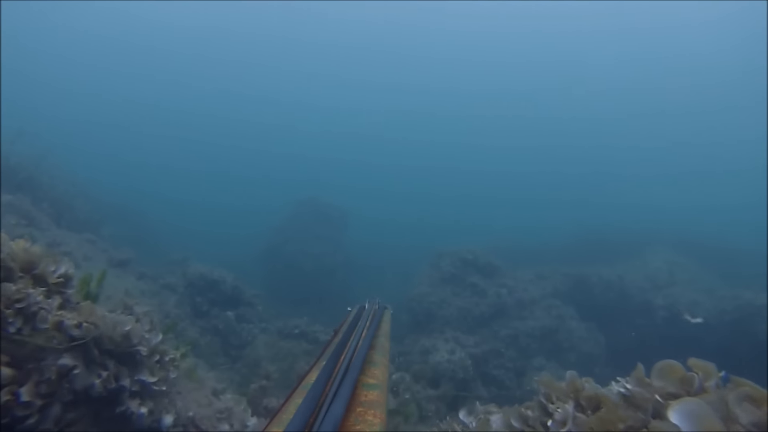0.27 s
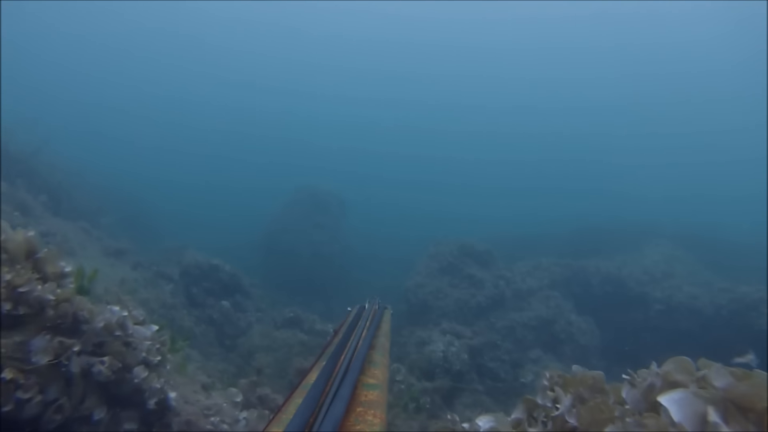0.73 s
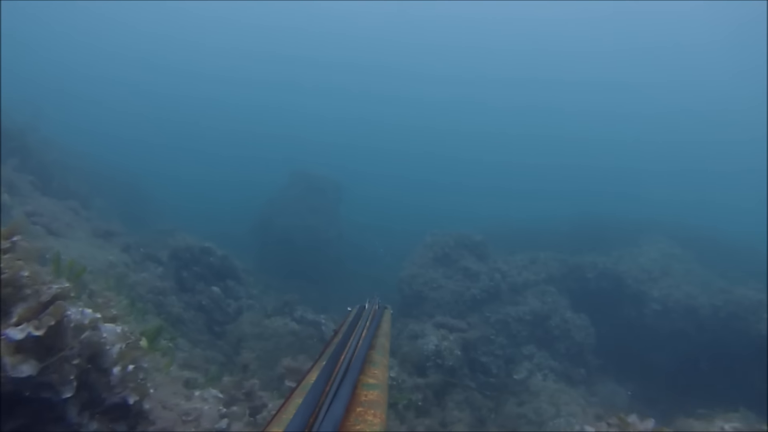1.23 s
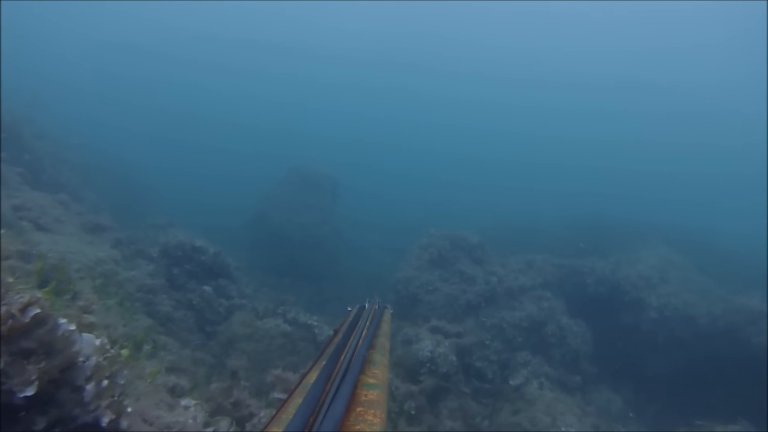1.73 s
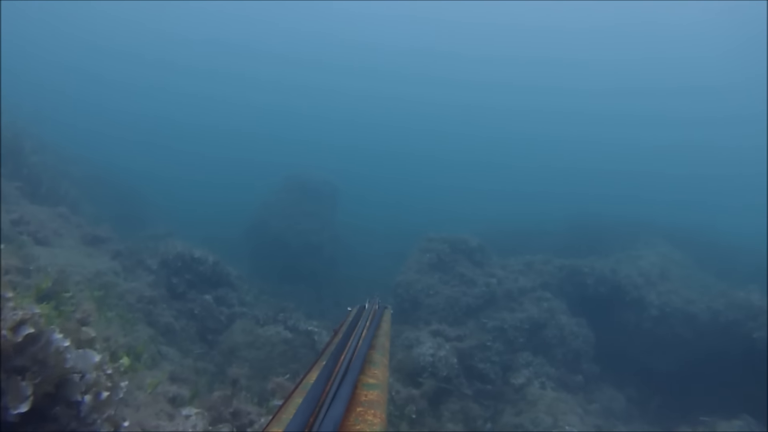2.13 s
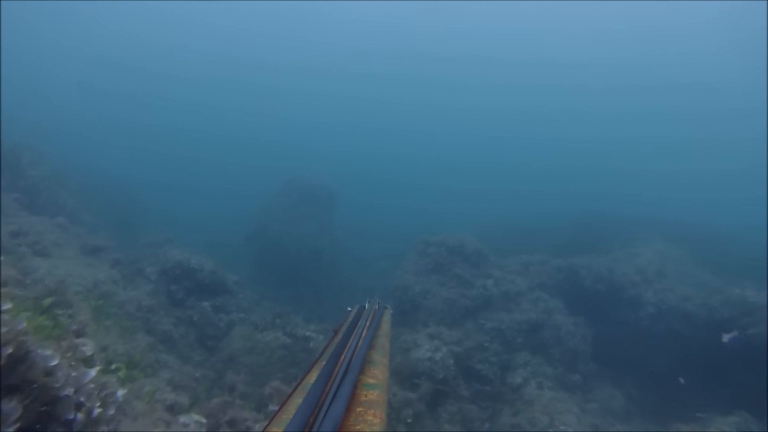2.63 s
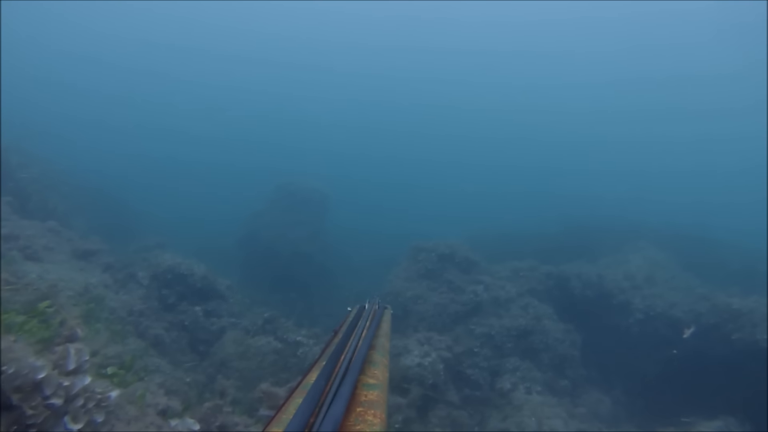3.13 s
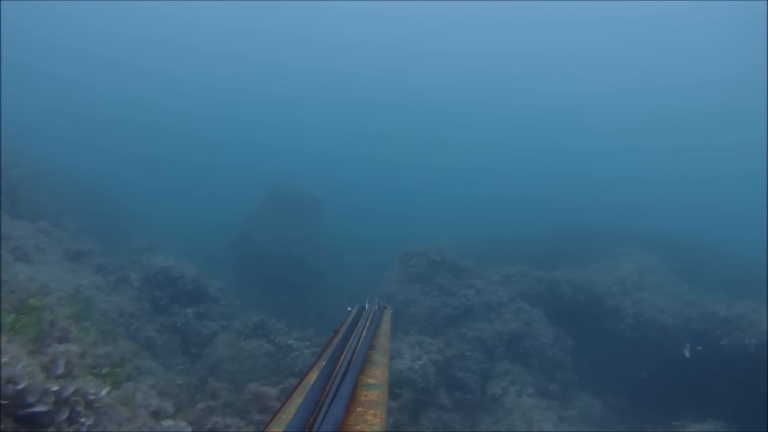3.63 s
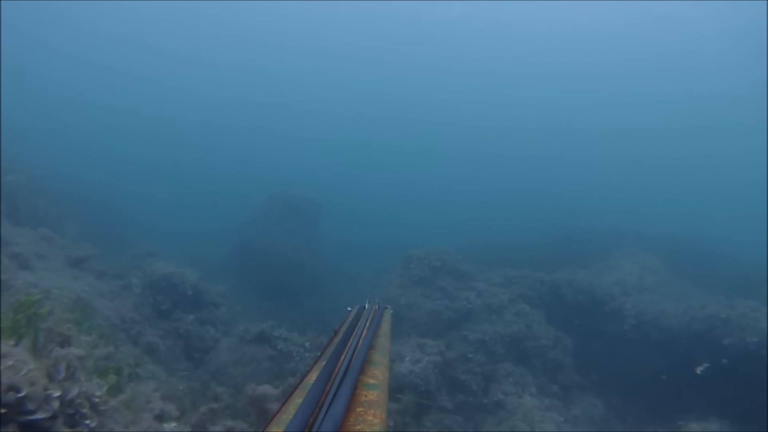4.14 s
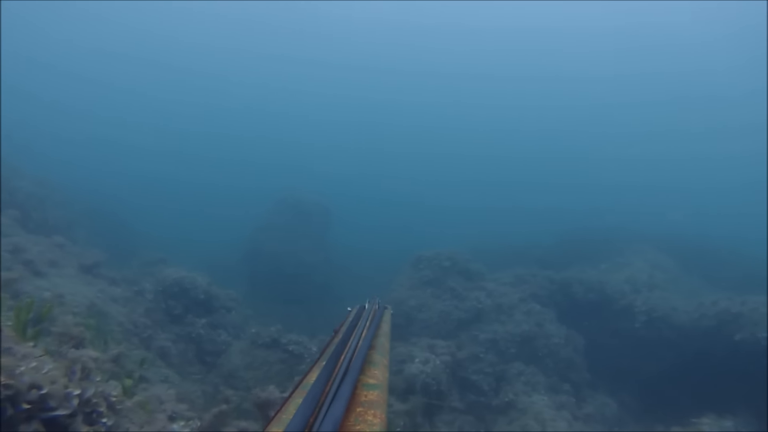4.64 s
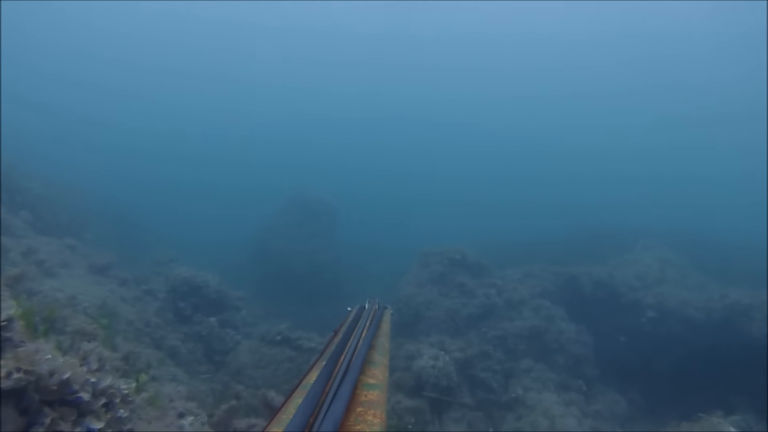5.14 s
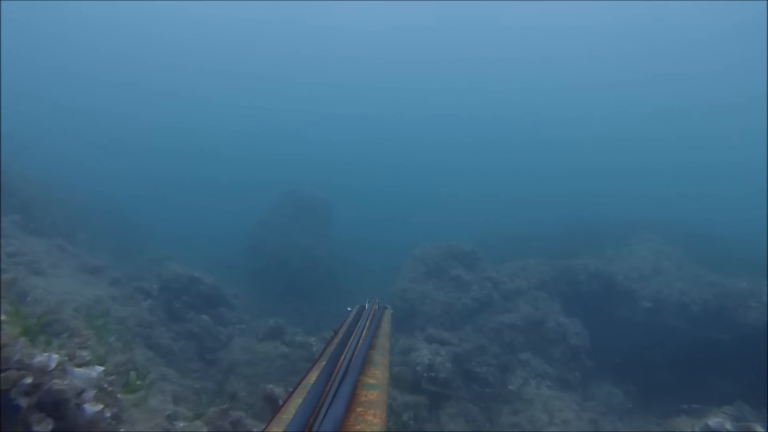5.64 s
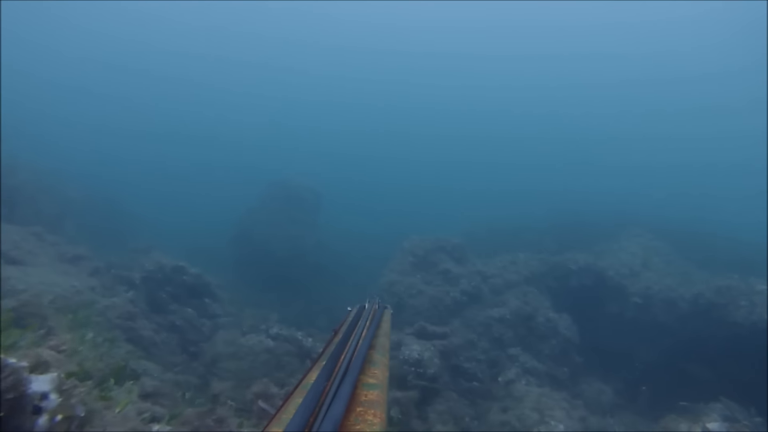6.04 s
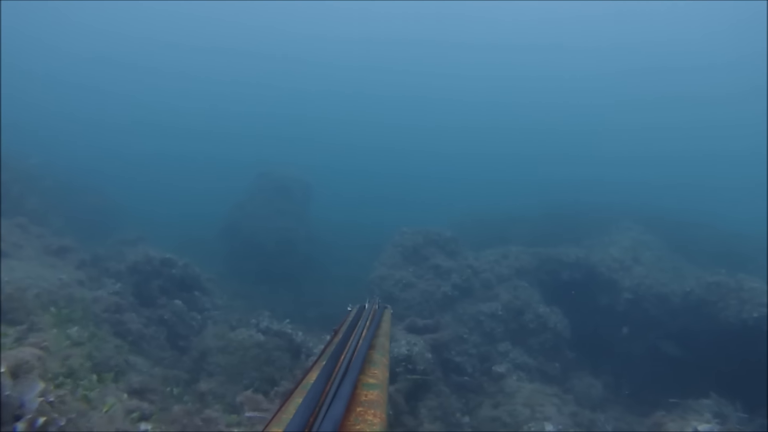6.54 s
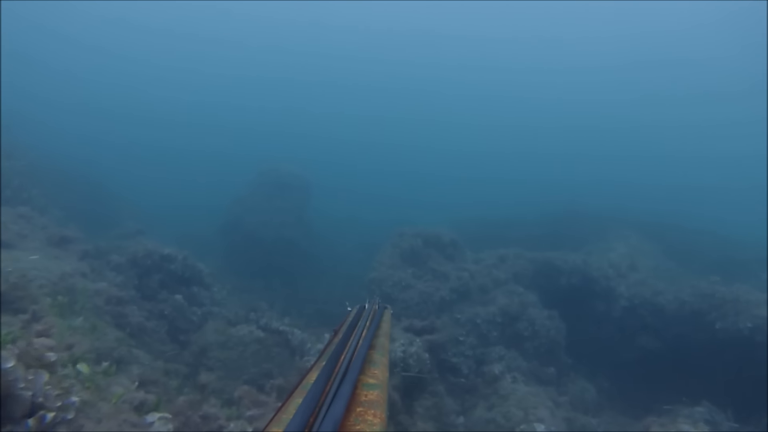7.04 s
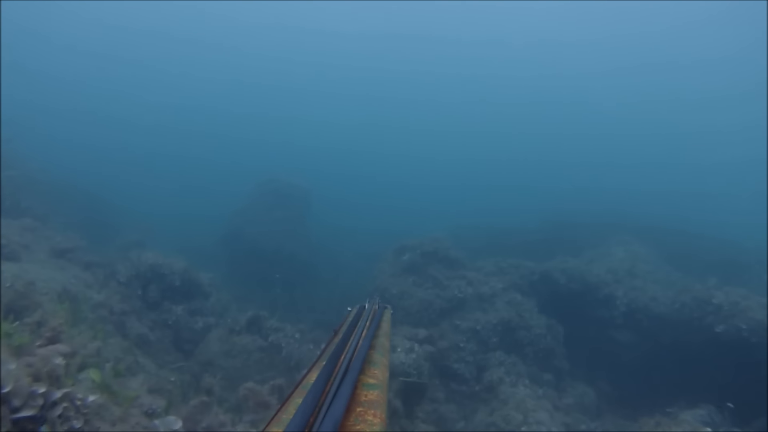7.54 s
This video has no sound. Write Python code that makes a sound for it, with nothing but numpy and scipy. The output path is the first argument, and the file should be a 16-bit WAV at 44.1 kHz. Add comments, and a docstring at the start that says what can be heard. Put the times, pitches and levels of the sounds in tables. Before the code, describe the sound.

Heard under water through a camera's waterproof case above a rocky reef: a constant fine hiss of far snapping shrimp, a dense irregular crackle of nearer ones, and single sharp clicks close by. A quiet low rush and rumble of water swells beneath. A faint short falling chirp comes near two seconds, with a few dull knocks; the loudest snaps fall in the second half.

```python
"""Under water over a rocky reef, heard through the waterproof case of a camera on a speargun.
Snapping shrimp click all around: a few close by, many as a crackle, countless far ones as a hiss.
Snaps are pulses with echo and scatter, the hiss is shaped noise, and all of them ring the resonant case.
Beneath lie a noise rush and rumble of water, a few dull knocks made of short low noise bursts,
and one short falling chirp, a gliding sine."""
import sys
import numpy as np
from scipy import signal
from scipy.fft import rfft, irfft, next_fast_len
from scipy.io import wavfile
from scipy.ndimage import map_coordinates

SR = 44100
rng = np.random.default_rng(int(sys.argv[2]) if len(sys.argv) > 2 else 0)


def materialize(psi):
    """Save the field psi as 16-bit PCM at rate SR to the path in sys.argv[1].

    A 1-D psi becomes a single channel; in a 2-D psi each row is a channel.
    """
    bounded = np.clip(np.atleast_2d(psi).T, -1, 1)
    quanta = np.round(bounded * 32767).astype(np.int16)
    wavfile.write(sys.argv[1], SR, quanta)


N = 343098  # length [samples]

# resonances of the camera case: (centre [Hz], width [Hz], level [dB])
CASE_RESONANCES = [(788, 157, -8.5), (1422, 102, -1.5), (1705, 193, -2.5), (2198, 296, -2), (2570, 60, -1),
                   (2837, 243, 1.5), (3290, 417, -2), (4028, 250, -3.5), (4435, 374, -8), (5000, 270, -3.5),
                   (5740, 530, -4), (6404, 590, -7.5), (7460, 700, -9), (8990, 2700, -13.5),
                   (10660, 320, -19), (13400, 2060, -17), (14800, 450, -37.5)]
# activity of the colony, for all but the close snaps: (time [s], relative level [dB])
COLONY_ACTIVITY = [(0.0, -1.2), (4.5, 0.12), (5.001, 0), (7.2, 1.1), (7.78, -1.5)]
# colour of the far snaps before the case: (frequency [Hz], relative level [dB])
FAR_COLOUR = [(600, 3), (1400, -1), (2800, -4), (5700, -2), (8000, 0), (13000, 4.5), (15000, -16)]
# band over which the crackle's spots differ in colour: (lowest [Hz], highest [Hz])
SPOT_RANGE_HZ = (550, 15000)
# colour of the low rush of water and camera: (frequency [Hz], relative level per Hz [dB])
RUSH_COLOUR = [(10, -11), (24, -10.5), (55, -11), (100, -13), (200, -15), (400, -19.5), (700, -23),
               (1200, -25.5), (3000, -45), (12000, -63), (15000, -50)]
# swells of water against the case: (time [s], relative peak level [dB], half-length [s])
WATER_SWELLS = [(0.505, -54, 0.051), (1.33, -53.5, 0.13), (2.107, -56, 0.12), (2.683, -54.5, 0.22),
                (3.526, -57, 0.033), (4.2, -54.5, .12), (5.777, -57.5, 0.11), (6.323, -51.5, .05),
                (6.574, -55, .04), (7.2, -60.5, 0.27)]
# close snaps: (time [s], level [dB], bass edge [Hz], treble edge [Hz], scatter off the rocks [ms])
CLOSE_SNAPS = [(0.245, -52.4, 1690, 1900, 4.5), (0.5105, -48.5, 7400, 7800, 2.96),
               (0.5261, -45.2, 13430, 10200, 0.82), (0.799, -48.5, 5400, 4860, 1),
               (0.919, -50, 13250, 14300, 1), (1.055, -41, 1880, 15600, 2.2),
               (1.217, -45.5, 3200, 4300, 2.6), (1.3024, -49.5, 3640, 6400, 1.6),
               (1.3437, -46, 9600, 8050, 2.26), (1.455, -46, 4100, 7100, 2.26),
               (1.7607, -31, 920, 3740, 0.91), (1.8992, -47.5, 3560, 18600, 2.54),
               (1.9535, -47.6, 3180, 7300, 1.6), (1.9819, -40, 9950, 8500, 1),
               (2.1368, -52, 410, 5500, 5.5), (2.3672, -46, 7350, 8300, 2.6),
               (2.8416, -50, 8710, 7900, 2.6), (2.9513, -49, 5110, 8300, 4.2),
               (3.173, -47, 1180, 15000, 3.4), (3.227, -50, 6520, 6400, 2.4),
               (3.3144, -48, 3390, 7300, 1.7), (3.3506, -36.5, 1480, 7700, 0.96),
               (3.5037, -46.5, 850, 6000, 2.3), (3.6406, -50, 1980, 16700, 3),
               (3.748, -45, 3090, 9000, 1.8), (3.848, -46.5, 10930, 5460, 1),
               (4.0104, -41.5, 2980, 9300, 1.4), (4.2856, -40.5, 3590, 4730, 1.2),
               (4.363, -47.5, 10970, 9900, 1.86), (4.3984, -41.5, 2580, 13500, 1.6),
               (4.459, -49.7, 11240, 10700, 3.9), (4.6045, -44.9, 2340, 7800, 1.9),
               (4.6096, -26, 940, 12000, 1.9), (4.7452, -32.5, 2280, 2760, 3.1),
               (4.8358, -29.1, 3540, 11000, 1.3), (4.869, -46, 350, 19000, 3.8),
               (5.063, -48.5, 6810, 8550, 0.94), (5.1089, -37.5, 1470, 10800, 2.96),
               (5.147, -46.5, 7100, 8800, 1.6), (5.3522, -43.5, 14480, 11000, 1.3),
               (5.445, -48.6, 3720, 21400, 3.1), (5.876, -44.6, 11760, 15500, 1.1),
               (5.9161, -35.5, 1450, 8400, 1.9), (6.0158, -47, 2260, 19100, 3.2),
               (6.1108, -44, 6800, 11400, 1.5), (6.1778, -35, 3220, 10400, 2.2),
               (6.4496, -30, 3880, 16900, 1.1), (6.4623, -34, 850, 12100, 2.1),
               (6.669, -46, 1200, 10400, 1.28), (6.701, -30, 3510, 14200, 0.5),
               (6.808, -35, 1480, 5300, 3.07), (6.894, -41, 5450, 9200, 2.5),
               (6.93, -42.5, 10140, 9000, 1.4), (7.0383, -39.5, 690, 2930, 2.8),
               (7.2131, -28.5, 14870, 11100, 1), (7.2751, -45, 8720, 7460, 1.1),
               (7.305, -33.5, 2050, 2500, 2.3), (7.3234, -25.5, 4250, 9600, 0.9),
               (7.368, -35.5, 5080, 6300, 1.15), (7.4987, -50, 3890, 10630, 4.8),
               (7.5829, -49, 6560, 7400, 2.7), (7.6524, -46.5, 10970, 8600, 2.5)]
# colour of the single snaps before the case: (frequency [Hz], relative level [dB])
NEAR_COLOUR = [(400, 8), (800, 4), (1100, 7.5), (1430, 4), (1900, 0.5), (2850, -1.15), (4000, -1.3),
               (6200, -1.85), (8400, -4), (10500, 0.1), (13000, -0.5), (16000, -8)]
# dull knocks: (time [s], relative level [dB], centre pitch [Hz])
DULL_KNOCKS = [(1.542, -46, 736), (4.242, -52, 673), (4.276, -40.5, 755), (4.863, -38.5, 720)]

SNAP_WINDOW_S = 0.01  # a snap's level is its whole energy as an rms over this time
TOP_HZ = 16500  # band limit of the camera


def amp(db):
    """Turn decibels into gain."""
    return 10 ** (np.asarray(db) / 20)


def unit(x):
    """Scale x to rms 1."""
    return x / np.sqrt(np.mean(x ** 2) + 1e-20)


def along(points, hz):
    """Join (Hz, value) points by lines on a log frequency axis, flat beyond the ends."""
    freqs, values = np.transpose(points)
    return np.interp(np.log(hz + 1), np.log(freqs + 1), values)


def wobble(rate):
    """Draw a smooth random curve through `rate` random knots a second."""
    knots = rng.standard_normal(int(N * rate / SR) + 4)
    return map_coordinates(knots, [np.arange(N) * rate / SR])


def filtered(x, response):
    """Multiply the spectrum of x by a response of frequency."""
    padded = next_fast_len(N + SR // 4)
    hz = np.fft.rfftfreq(padded, 1 / SR)
    return irfft(rfft(x, padded) * response(hz), padded)[:N]


def causal(gain):
    """Give a gain curve minimum phase, so that it rings only after its cause."""
    cepstrum = irfft(np.log(np.maximum(gain, 1e-6)))
    half = len(cepstrum) // 2
    cepstrum[1:half] *= 2  # fold the time before zero onto the time after
    cepstrum[half + 1:] = 0
    return np.exp(rfft(cepstrum))


def add(track, s, sound):
    """Mix a sound into the track at time s."""
    part = track[max(round(s * SR), 0):][:len(sound)]
    part += sound[:len(part)]


def case_gain(hz):
    """What the case lets through: the summed power of a row of steep-sided resonances."""
    power = 0
    for centre, width, db in CASE_RESONANCES:
        power = power + amp(db) ** 2 / (1 + ((hz - centre) / width) ** 2) ** 3
    return np.sqrt(power)


def scatter_cloud(life_ms, size):
    """Spectrum of dense reflections: a dying noise burst with the energy of one unit pulse."""
    ms = np.arange(size) * 1000 / SR
    burst = rng.standard_normal(size) * np.exp(-ms / max(life_ms, 0.2))
    return rfft(unit(burst)) / np.sqrt(size)


def arrivals(scatter_ms, direct=0.59, echo=0.39, echo_ms=2.3, echo_spread=0.31, reef_db=-19, reef_ms=9,
             linger=2.47, weed_hz=5000, evenness=0.93, span=1.31, size=4096):
    """One collapsing bubble: the direct pulse, an echo off near rock, dense scatter and a faint reef tail."""
    hz = np.fft.rfftfreq(size, 1 / SR)
    # weed soaks up the treble, so the low notes linger longer
    kept = 1 / (1 + (hz / weed_hz) ** 4)
    slow = scatter_cloud(scatter_ms * linger, size) + amp(reef_db) * scatter_cloud(reef_ms, size)
    fast = scatter_cloud(scatter_ms, size)
    scatter = slow * causal(np.sqrt(kept)) + fast * np.sqrt(1 - kept)
    delay_s = echo_ms * (1 + echo_spread * rng.uniform(-0.99, 1)) / 1000
    paths = direct + echo * np.exp(-2j * np.pi * hz * delay_s) + scatter

    # interference cuts fine notches, but the broad colour is pulled nearly even
    energy = np.cumsum(abs(paths) ** 2)
    upper = np.clip(np.searchsorted(hz, hz * span + 100), 0, len(hz) - 1)
    lower = np.clip(np.searchsorted(hz, hz / span - 100), 0, len(hz) - 1)
    broad_power = (energy[upper] - energy[lower]) / (upper - lower)
    return paths * causal(broad_power ** (-evenness / 2))


def snap(db, bass_hz, treble_hz, scatter_ms, bass_slope=3.65, treble_slope=5.3, size=4096):
    """One snap ringing the case: a small bubble lacks bass, and rock and weed in the way take off treble."""
    hz = np.fft.rfftfreq(size, 1 / SR)
    bass_loss = 1 + (bass_hz / (hz + 1)) ** bass_slope
    treble_loss = 1 + (hz / treble_hz) ** treble_slope
    passed = 1 / np.sqrt(bass_loss * treble_loss)
    colour = passed * case_gain(hz) * amp(along(NEAR_COLOUR, hz))
    sound = irfft(arrivals(scatter_ms) * causal(colour))
    return amp(db) * sound / np.sqrt(np.sum(sound ** 2) / (SNAP_WINDOW_S * SR))


def far_hiss(db=-62, flutter_db=2.0, flutter_rate=150):
    """The snaps of the whole reef merge into a hiss: fluttering noise coloured by distance and case."""
    noise = rng.standard_normal(N)
    hiss = unit(filtered(noise, lambda hz: case_gain(hz) * amp(along(FAR_COLOUR, hz))))
    return amp(db + flutter_db * wobble(flutter_rate)) * hiss


def crackle(colour, db, scatter_ms, spread_db, variety_db, count, strongest=3.3, spots=16, size=4096):
    """Snaps at middle distance: random times and sizes, from spots that each colour them differently."""
    out, hz = np.zeros(N), np.fft.rfftfreq(size, 1 / SR)
    gain = case_gain(hz) * amp(along(colour, hz))
    knots_hz = np.geomspace(*SPOT_RANGE_HZ, 6)
    for _ in range(spots):
        tilt_db = variety_db * rng.standard_normal(len(knots_hz))
        spot = amp(along(np.c_[knots_hz, tilt_db], hz))
        click = unit(irfft(arrivals(scatter_ms) * causal(gain * spot)))
        when, nearness = rng.random((count // spots, 2)).T
        # few are near and strong, many are far and weak
        strength = amp(spread_db * np.minimum(-np.log(1 - nearness), strongest))
        pulses = np.bincount((when * N).astype(int), strength, N)
        out += signal.oaconvolve(pulses, click)[:N]
    return amp(db) * unit(out)


def stray_snaps(db=-54, spread_db=3.2, bass_hz=3000, treble_hz=7000, scatter_ms=2.2, variety=0.6, count=44):
    """Weaker snaps from the rocks around, at random times, each with a size and colour of its own."""
    out = np.zeros(N)
    times = (np.arange(count) + rng.random(count)) * N / SR / count  # one in each equal slot
    for s in times:
        strength, *shape = rng.standard_normal(4)
        bass, treble, scatter = np.exp(variety * np.array(shape)) * [bass_hz, treble_hz, scatter_ms]
        add(out, s, snap(db + spread_db * strength, bass, treble, scatter))
    return out


def water(db=-60, surge_db=-68, swell_db=0.8, surge_hz=25, width_hz=14):
    """A steady low rush, and a rumble that rises with each swell of water against the case."""
    t = np.arange(N) / SR
    rush = unit(filtered(rng.standard_normal(N), lambda hz: amp(along(RUSH_COLOUR, hz))))
    surge = unit(filtered(rng.standard_normal(N), lambda hz: np.exp(-((hz - surge_hz) / width_hz) ** 2)))
    swelling = np.zeros(N)
    for s, peak_db, length in WATER_SWELLS:
        swelling += amp(swell_db + peak_db) * np.exp(-((t - s) / length) ** 2)
    return amp(db) * rush + np.hypot(amp(surge_db), swelling) * surge


def close_snaps():
    """The shrimp nearest the camera, each snap heard on its own."""
    out = np.zeros(N)
    for s, level_db, bass_hz, treble_hz, scatter_ms in CLOSE_SNAPS:
        add(out, s, snap(level_db, bass_hz, treble_hz, scatter_ms))
    return out


def knocks(db=4, t60=0.018, attack=0.0019, width=0.23):
    """Soft, dull knocks: short noise bursts in a broad low resonance (times in s, width in log Hz)."""
    out, t = np.zeros(N), np.arange(SR // 10) / SR
    hz = np.fft.rfftfreq(len(t), 1 / SR)
    for s, level_db, pitch_hz in DULL_KNOCKS:
        phases = np.exp(2j * np.pi * rng.random(len(hz)))
        resonance = np.exp(-(np.log((hz + 1) / pitch_hz) / width) ** 2 / 2)
        body = unit(irfft(phases * resonance))
        envelope = amp(db + level_db - 60 * t / t60) * (1 - np.exp(-t / attack))
        add(out, s, envelope * body)
    return out


def chirp(s=1.856, db=-54, start_hz=895, end_hz=790, glide=0.0538, t60=0.22, attack=0.0039):
    """One faint, short sine that slides down to its end pitch as it fades (times in s)."""
    out, t = np.zeros(N), np.arange(SR // 5) / SR
    pitch_hz = np.interp(t, [0, glide], [start_hz, end_hz])
    phase = 2 * np.pi * np.cumsum(pitch_hz) / SR
    envelope = amp(db - 60 * t / t60) * (1 - np.exp(-t / attack))
    add(out, s, envelope * np.sin(phase))
    return out


def scene():
    """Shrimp in the open sound sharp, those behind rock and weed dull and smeared; one activity sways the reef."""
    # crackle colours: (frequency [Hz], relative level [dB])
    sharp_colour = [(1400, -12.5), (3000, -15.0), (6000, 2.5), (11000, 3), (15000, 1.0)]
    dull_colour = [(700, 5), (1500, -2.5), (4000, 3.5), (9000, -5.5)]
    sharp = crackle(sharp_colour, db=-59.5, scatter_ms=0.82, spread_db=5.5, variety_db=6, count=1600)
    dull = crackle(dull_colour, db=-63.0, scatter_ms=2.1, spread_db=3.5, variety_db=5, count=560)
    activity = amp(np.interp(np.arange(N) / SR, *np.transpose(COLONY_ACTIVITY)))
    reef = activity * (far_hiss() + sharp + dull + stray_snaps())
    return (reef + water() + close_snaps() + knocks() + chirp())[None]


def record(dry):
    """The camera's treble falls away, and it keeps nothing above its band limit."""
    treble = [(14000, 0), (15200, -3.5), (16200, -8)]  # (frequency [Hz], level [dB])
    return np.array([filtered(dry[0], lambda hz: amp(along(treble, hz)) * (hz < TOP_HZ))])


dry = scene()
out = record(dry)
materialize(out)
```